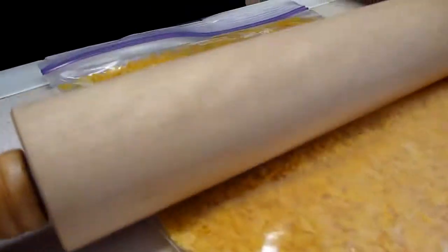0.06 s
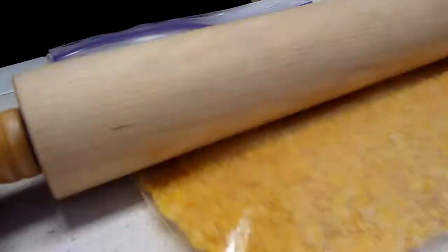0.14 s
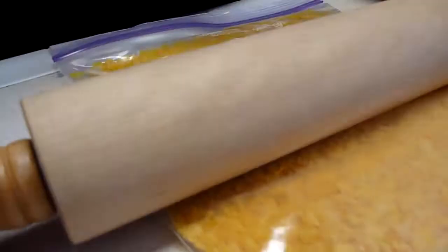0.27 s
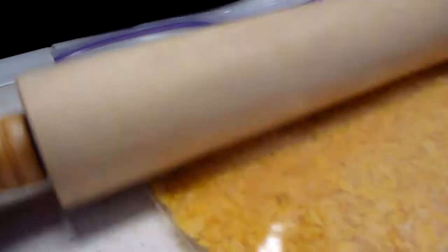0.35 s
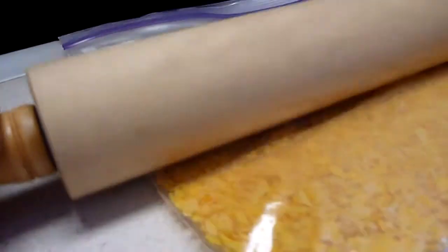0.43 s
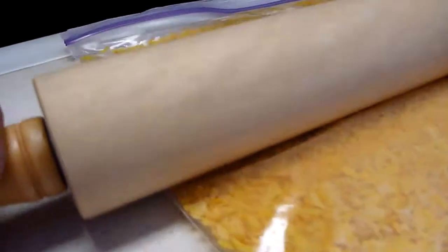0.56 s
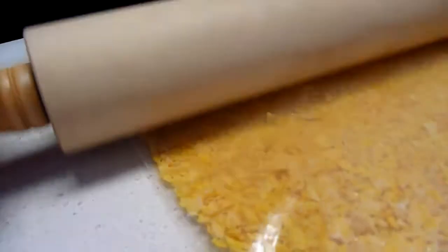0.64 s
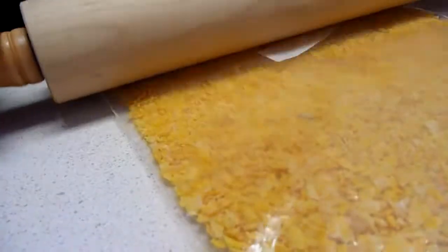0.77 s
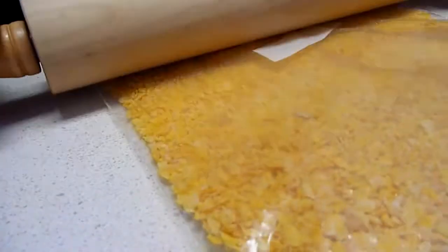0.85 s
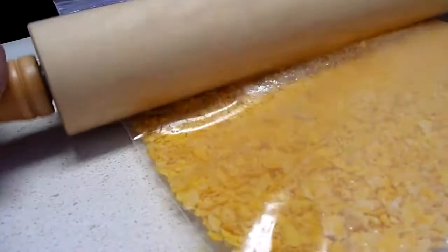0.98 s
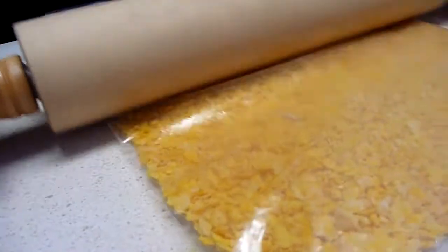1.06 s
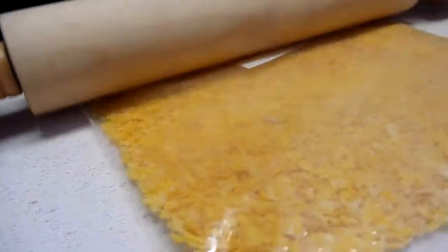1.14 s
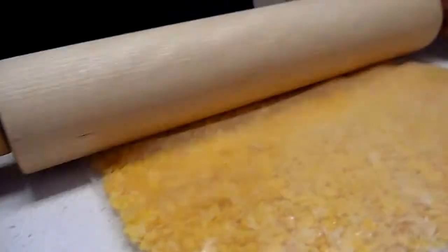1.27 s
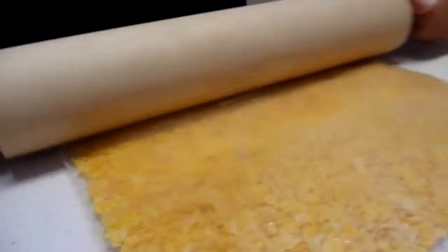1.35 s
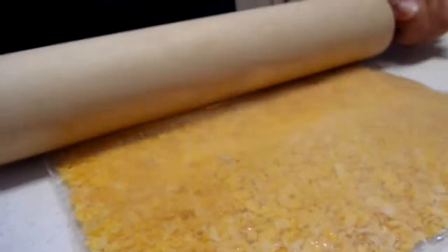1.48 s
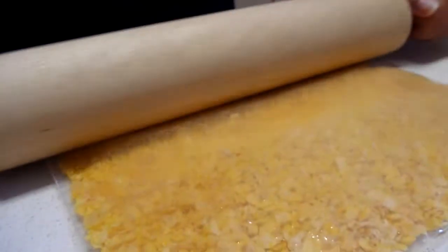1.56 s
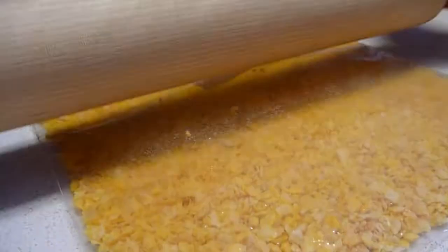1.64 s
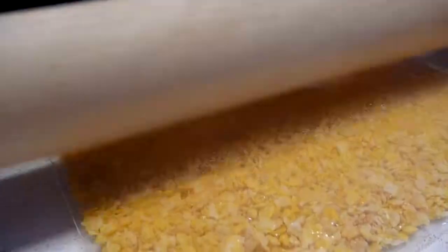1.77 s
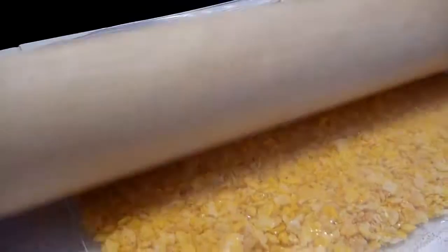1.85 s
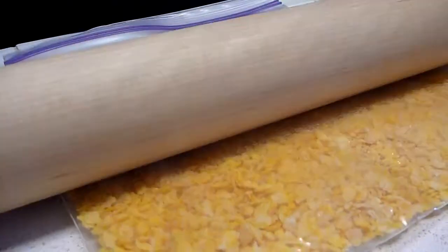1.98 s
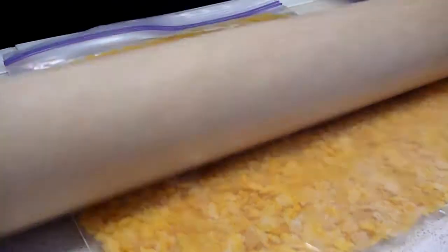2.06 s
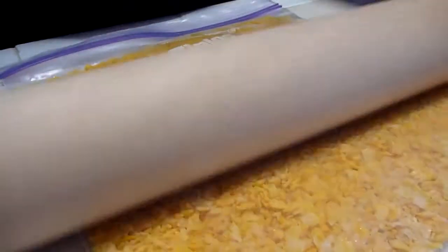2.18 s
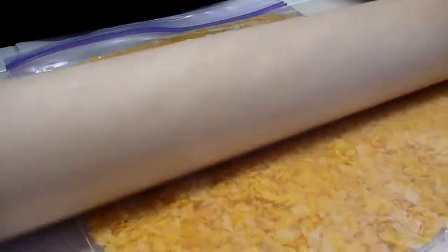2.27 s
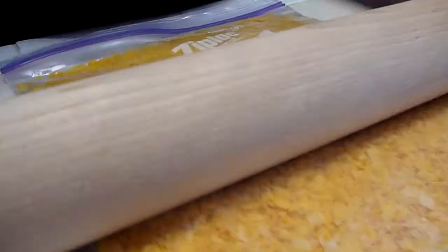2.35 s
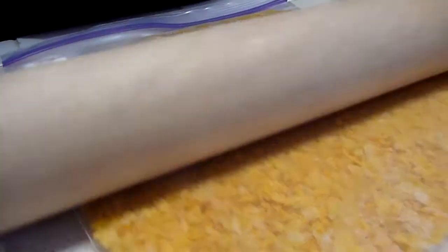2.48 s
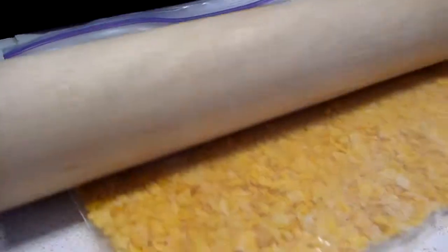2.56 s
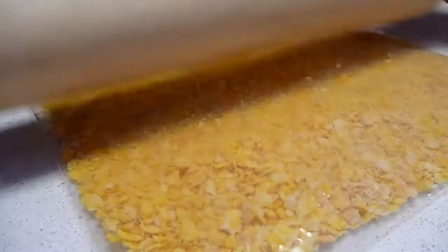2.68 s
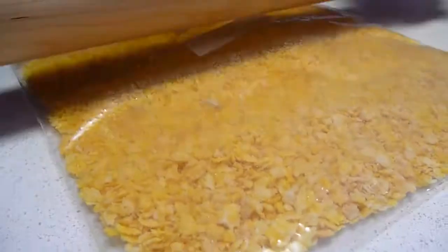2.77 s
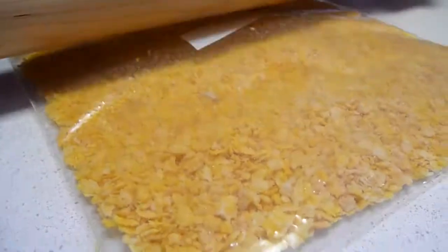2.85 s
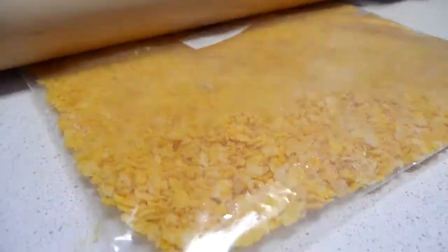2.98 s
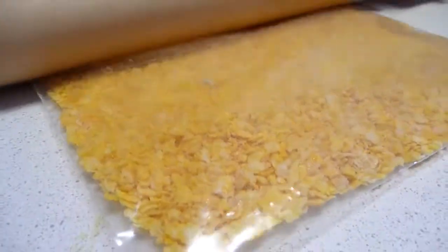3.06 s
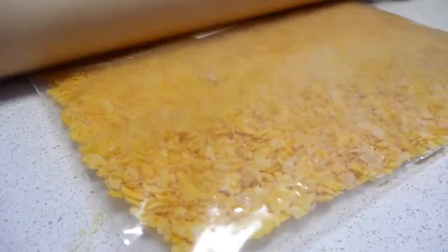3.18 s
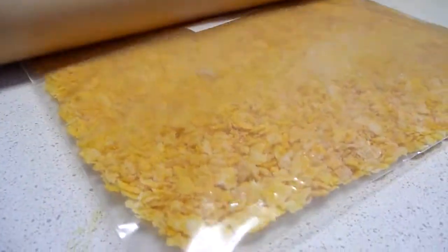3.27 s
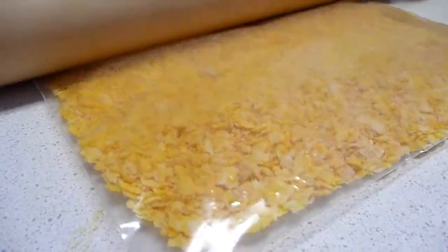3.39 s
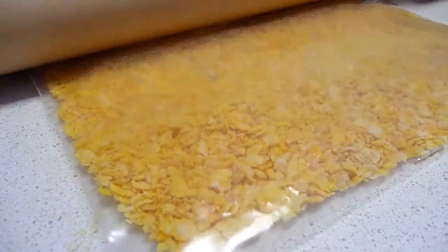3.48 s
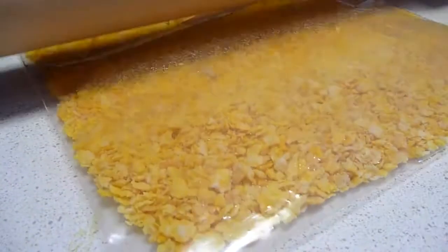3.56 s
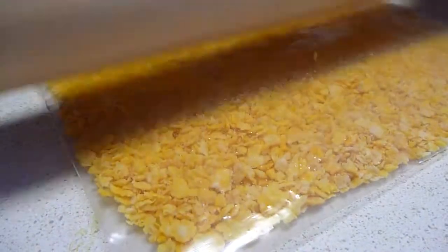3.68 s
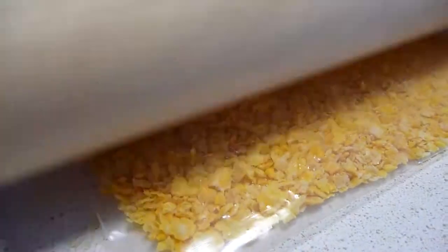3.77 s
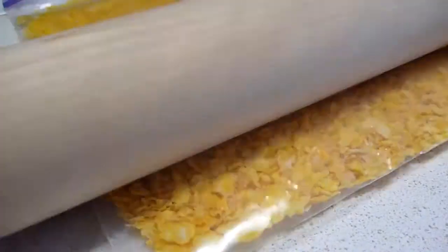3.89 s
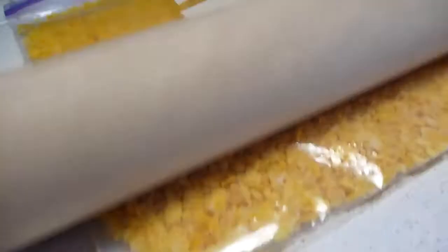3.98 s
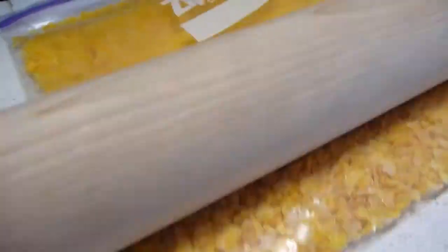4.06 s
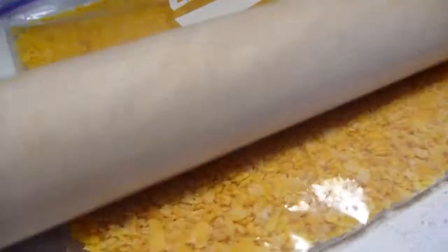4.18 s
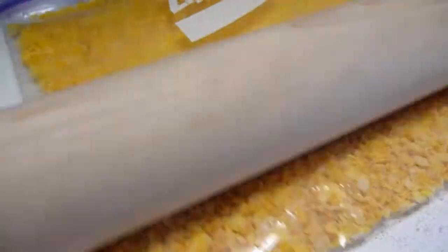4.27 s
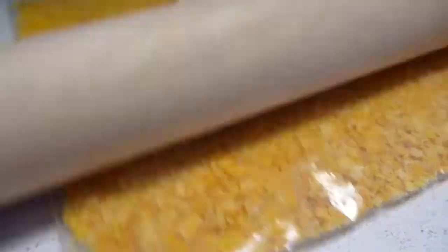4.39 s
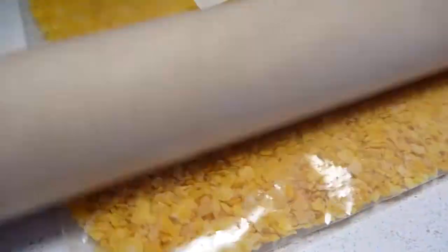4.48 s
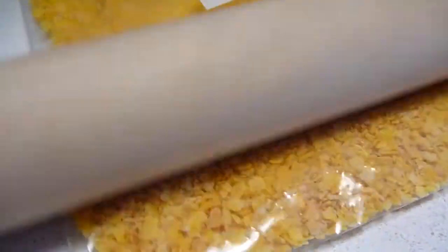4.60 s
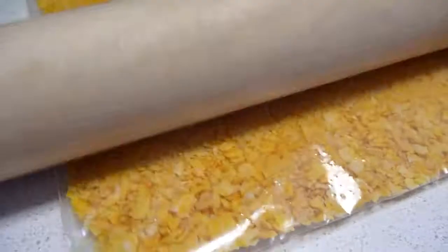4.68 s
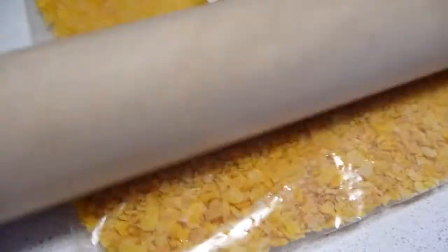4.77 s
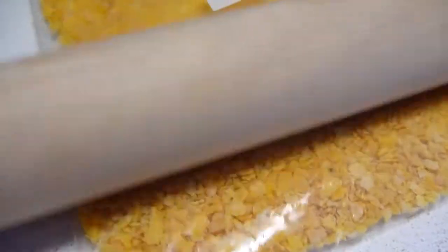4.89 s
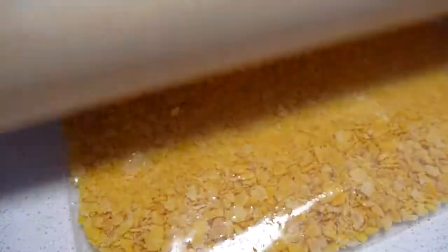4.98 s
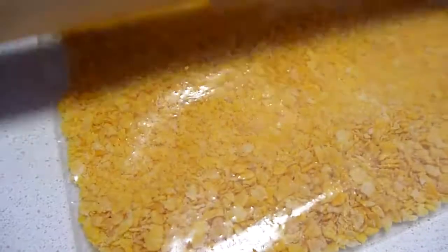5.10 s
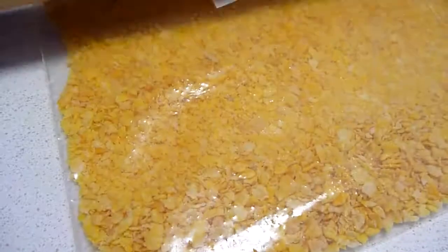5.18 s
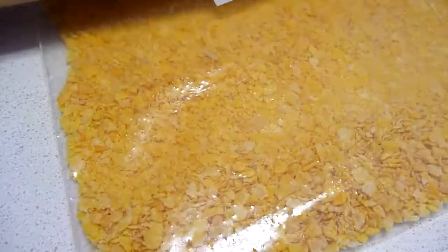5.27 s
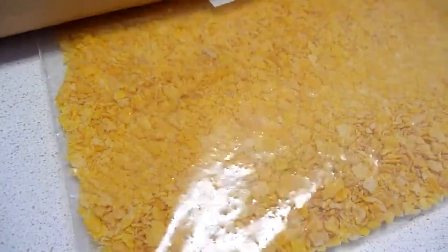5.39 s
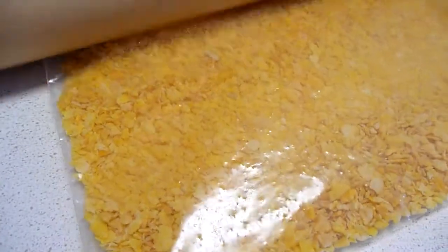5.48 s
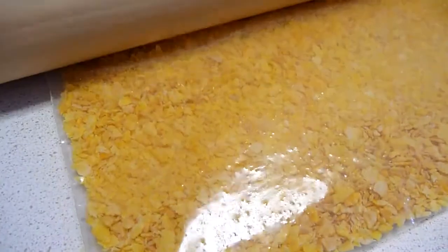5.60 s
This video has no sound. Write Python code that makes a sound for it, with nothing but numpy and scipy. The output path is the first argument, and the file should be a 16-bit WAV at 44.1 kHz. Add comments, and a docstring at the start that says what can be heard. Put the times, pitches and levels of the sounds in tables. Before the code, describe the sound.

Close, crisp bursts of crushing flakes with plastic crinkle and low counter thuds, broken by brief pauses, a faint squeak and hard knocks.

```python
"""In a kitchen a wooden rolling pin is rocked in short strokes on a sealed plastic bag of dry cereal.
Flakes break as dense damped-sine grains: thuds in the counter, cracks under the pin, crinkles of the film.
Big cracks, film snaps and knocks that ring the pin are single pings with a faint room echo.
Shaped noise is the soft hum of the room; once a stick-slip sum of wavering overtones squeaks.
The microphone has two narrow notches, soft saturation and a steep treble limit."""
import sys
import numpy as np
from scipy import signal
from scipy.fft import rfft, irfft, next_fast_len
from scipy.io import wavfile
from scipy.ndimage import map_coordinates

SR = 44100
rng = np.random.default_rng(int(sys.argv[2]) if len(sys.argv) > 2 else 0)


def transcribe(signal):
    """Save signal, clipped to [-1, 1], as a 16-bit WAV file at the path in sys.argv[1]."""
    frames = np.atleast_2d(signal).T
    limited = np.clip(frames, -1, 1)
    pcm = np.round(limited * 32767).astype(np.int16)
    wavfile.write(sys.argv[1], SR, pcm)


def voltage_ratio(decibels):
    """Convert decibels (scalar or array-like) to amplitude ratios, 20 dB per decade."""
    exponent = np.asarray(decibels, float) / 20
    return 10 ** exponent


N = 248724  # samples


def unit(x):
    """Scaled to rms 1."""
    return x / np.sqrt(np.mean(x ** 2) + 1e-20)


def along(points, hz):
    """(Hz, value) points interpolated on a log frequency axis."""
    f, v = np.transpose(points)
    return np.interp(np.log(hz + 1), np.log(f + 1), v)


def wobble(knots_per_s):
    """A smooth random curve through normal random knots."""
    knots = rng.standard_normal(int(N * knots_per_s / SR) + 4)
    return map_coordinates(knots, [np.arange(N) * knots_per_s / SR])


def filtered(x, response):
    """x times a complex response of frequency."""
    m = next_fast_len(N + SR // 2)
    return irfft(rfft(x, m) * response(np.fft.rfftfreq(m, 1 / SR)), m)[..., :N]


def pings(start_s, hz, cycles, gain, size):
    """Damped sines with soft onsets, e^-3 after the given cycles, tapered to zero over size samples."""
    turns = hz[:, None] * np.arange(size) / SR
    taper = np.cos(np.pi / 2 * np.arange(size) / size)
    shape = (1 - np.exp(-turns / 0.2)) * np.exp(-3 * turns / cycles) * taper
    waves = gain[:, None] * shape * np.sin(2 * np.pi * turns)
    at = np.round(start_s * SR).astype(int)[:, None] + np.arange(size)
    return np.bincount(at.ravel(), waves.ravel(), N + size)[:N]


# noise density of the room: f/Hz, level/dB
HUM_SPECTRUM = [(20, -26), (60, -15), (90, -29), (130, -13), (182, -23), (218, 0), (274, -13), (320, -2),
                (420, -6.5), (520, -5), (1580, -11), (2330, -13), (2940, -13.5), (6000, -18),
                (11800, -24.5), (15300, -61)]
HUM_DB = -54.5


def hum():
    """Soft room noise: shaped Gaussian noise with a slight level drift."""
    noise = filtered(rng.standard_normal(N), lambda f: voltage_ratio(along(HUM_SPECTRUM, f)))
    return voltage_ratio(HUM_DB + 0.91 * wobble(8.1)) * unit(noise)


# room decay: f/Hz, t60/s
ROOM_DECAY = [(200, 0.86), (2000, 0.18), (10000, 0.099)]


def kitchen(x):
    """Room echo: a noise tail in which each frequency decays at its own speed."""
    hz, t, z = signal.stft(rng.standard_normal(SR // 2), SR, nperseg=256)
    decay = voltage_ratio(-60 * t / along(ROOM_DECAY, hz)[:, None])
    tail = signal.istft(z * decay, SR, nperseg=256)[1]
    return signal.fftconvolve(np.pad(x, (200, 0)), tail / np.linalg.norm(tail))[:N]


# harmonics of the squeak: multiple of the fundamental, level/dB
SQUEAK_HARMONICS = [(1, -14), (2, 0), (3, -14), (4, -14), (5, -12), (6, -2), (7, -25), (8, -21), (9, -25),
                    (10, -20), (11, -21), (13, -24)]
# slips of the squeak: t/s, level/dB
SQUEAK_SLIPS = [(3.575, -50), (3.6, -39), (3.642, -38), (3.676, -46), (3.707, -43), (3.737, -45),
                (3.775, -58)]
SLIP_DB_PER_S = 560  # swell and fade around each slip
SQUEAK_S, SQUEAK_HZ, SAG_HZ_PER_S = 3.6, 674, 31  # pitch sags from SQUEAK_S on
DULL_DB_PER_S, SIXTH_DB_PER_S, MAX_DULL_DB = 40, 300, 20  # loss of orders > 5 away from SQUEAK_S


def squeak():
    """Stick-slip in short slips, sagging in pitch; overtones waver, the high ones peak at SQUEAK_S."""
    t = np.arange(N) / SR
    level_db = np.max([db - SLIP_DB_PER_S * np.abs(t - s) for s, db in SQUEAK_SLIPS], 0)
    sag_s = np.clip(t - SQUEAK_S, 0, 1)
    turns = np.cumsum((SQUEAK_HZ - SAG_HZ_PER_S * sag_s) * (1 + 0.005 * wobble(60))) / SR
    out = np.zeros(N)
    for order, db in SQUEAK_HARMONICS:
        dull_db_per_s = SIXTH_DB_PER_S if order == 6 else DULL_DB_PER_S * (order > 5)
        dull_db = np.minimum(dull_db_per_s * np.abs(t - SQUEAK_S), MAX_DULL_DB)
        gain = np.sqrt(2) * voltage_ratio(level_db + db - dull_db + 2.7 * wobble(45))
        out += gain * np.sin(2 * np.pi * (order * turns + rng.random()))
    return out


# free knocks: t/s, thump level/dB, ring level/dB, extra upper-mode level/dB, crushed-flake burst level/dB
PIN_KNOCKS = [(1.5485, -40, -27, 14, -25), (2.9556, -6, -32, 6, -19), (5.3192, -3, -17, -10, -20)]
# modes of the pin: f/Hz, level/dB, t60/s (before the taper)
PIN_MODES = [(2340, -15, .45), (2331, 0, .1), (2430, -14, .25), (2546, -10, .09)]
UPPER_HZ = 2500


def knocks():
    """A knock thumps the counter and rings the pin; where it lands sets how much the upper mode speaks."""
    s, thump_db, ring_db, upper_db, _ = np.transpose(PIN_KNOCKS)
    ring = np.zeros(N)
    for hz, db, t60_s in PIN_MODES:
        gain = voltage_ratio(ring_db + db + upper_db * (hz > UPPER_HZ))
        cycles = 3 * hz * t60_s / np.log(1000)
        ring += pings(s + 0.00156, np.full(len(s), hz), cycles, gain, size=16000)
    thump = pings(s, np.full(len(s), 375), 3.2, voltage_ratio(thump_db), size=3000)
    return ring * voltage_ratio(2.3 * wobble(70)) + thump


def blow_load():
    """Each knock crushes a burst of flakes at once: gain rises, then falls, within milliseconds."""
    t = np.arange(N) / SR
    out = np.zeros(N)
    for s, *_, burst_db in PIN_KNOCKS:
        u = t - s - .002
        out += voltage_ratio(burst_db) * np.where(u < 0, np.exp(np.minimum(u, 0) / 0.0034), np.exp(-np.abs(u) / 0.0036))
    return out


# sharp snaps of the film: t/s, level/dB
FILM_SNAPS = [(0.1675, -21), (0.6189, -27), (0.9955, -11.5), (1.007, -13.5), (2.379, -23), (2.9597, -10.5),
              (3.261, -20), (4.106, -18.5), (4.192, -17), (4.4342, -22), (5.321, -10), (5.5521, -11.5)]


def snaps():
    """The film buckles: a very short high click, then a duller one under it."""
    s, db = np.transpose(FILM_SNAPS)
    draw = rng.standard_normal((len(s), 2))
    click = pings(s, 8600 * np.exp(0.073 * draw[:, 0]), 2.5, voltage_ratio(db + 11), size=80)
    dull = pings(s + .0012, 5600 * np.exp(.3 * draw[:, 1]), 2.5, voltage_ratio(db + 3), size=80)
    return click + dull


# big flakes and blows: t/s, crack level/dB, thud level/dB
BIG_CRACKS = [(0.056, -15.5, -14), (0.169, -25, -27), (0.1976, -11, -7), (0.2716, -12.5, -34),
              (0.3104, -15, -16), (0.343, -11, -6), (0.4129, -9, -32), (0.4397, -7, -17),
              (0.4505, -8.5, -21), (0.5205, -6.5, -20), (0.8774, -4.5, -13), (0.9346, -7, -19),
              (0.977, -14, -21), (1.0079, -24, -23), (1.051, -21, -13), (1.2101, -4, -13),
              (1.2631, -6.5, -13), (1.3326, -6.5, -23), (1.4559, -13, -15), (1.4669, -10.5, -29),
              (1.5486, -20, -16.5), (1.8924, -4, -25), (1.927, -14, -11), (1.9551, -10, -12),
              (1.963, -7, -6), (2.0442, -18, -19), (2.1998, -14, -17), (2.2625, -13, -30),
              (2.3333, -10, -27), (2.381, -14, -21), (2.4183, -5.5, -30), (2.4317, -11, -19),
              (2.4477, -15, -12), (2.9565, -7, -5), (2.9647, -9, -4.5), (3.107, -10.5, -13),
              (3.1844, -12, -16), (3.2013, -8.5, -16), (3.212, -14, -17), (3.2265, -5.5, -23),
              (3.2702, -7.5, -26), (3.2768, -8, -19), (3.2992, -8, -32), (3.332, -18, -26),
              (3.8965, -18, -31), (3.9533, -10, -7), (4.088, -22, -32), (4.1041, -17, -20),
              (4.1429, -16, -12), (4.1592, -8, -8), (4.193, -9, -13), (4.231, -11, -7),
              (4.3681, -15, -10.5), (4.4026, -13, -26), (4.4261, -10.5, -18), (4.4356, -8, -21),
              (4.5784, -16, -31), (4.6206, -12, -25.5), (4.6309, -16, -6.5), (4.6898, -33, -23),
              (4.7559, -19, -24), (4.8127, -14.5, -17.5), (5.3211, 2.5, -6.5), (5.488, -24, -25)]
CRACK_HZ, CRACK_SCATTER = 2230, 0.025  # pitch, its log spread


def cracks():
    """Each big flake gives a short crack, a low push into the counter and a faint tick in the film."""
    s, db, thud_db = np.transpose(BIG_CRACKS)
    draw = rng.standard_normal((len(s), 4))
    crack_hz = CRACK_HZ * np.exp(CRACK_SCATTER * draw[:, 3])
    crack = pings(s, crack_hz, 3.34, voltage_ratio(db + 3) * np.sign(draw[:, 1]), size=300)
    thud = pings(s, 480 * np.exp(0.27 * draw[:, 0]), 2.55, voltage_ratio(thud_db - 2.5), size=900)
    tick = pings(s, 5500 * np.exp(0.53 * draw[:, 1]), 3.0, voltage_ratio(db - 8 + 1.7 * draw[:, 2]), size=60)
    return crack + thud + tick


def debris():
    """Gain of the smaller breaks each big crack sets off: starts at once, dies within milliseconds."""
    s, db, *_ = np.transpose(BIG_CRACKS)
    shower_gain = voltage_ratio(np.minimum(db, -11))  # a flake holds only so many crumbs
    starts = np.bincount(np.round(s * SR).astype(int), shower_gain, N)
    return signal.fftconvolve(starts, np.exp(-np.arange(SR // 20) / SR / 0.0039))[:N]


# pin strokes and faint bag rustles:
# t/s, length/s, crack level/dB, swell to the end/dB, crinkle level re crack/dB
PIN_STROKES = [(0.0, 0.031, -37.5, -2, -8), (0.062, 0.033, -27.5, 5.5, -11.5),
               (0.176, 0.077, -24.5, -6.5, -8), (0.277, 0.015, -32, 0, -13),
               (0.314, 0.059, -24, -2.0, -10.5), (0.41, 0.1, -27, -1.5, -8.5), (0.574, 0.045, -43, 4.5, -5),
               (0.656, 0.16, -52, 6.5, 2), (0.82, 0.028, -32.0, 4, -11.5), (0.876, 0.11, -27.0, 3.0, -8.5),
               (1.048, 0.055, -27.5, 2, -10.5), (1.151, 0.098, -27.5, 3, -8.5),
               (1.311, 0.075, -28.5, 1.5, -11), (1.439, 0.073, -31.5, 1.5, -9),
               (1.566, 0.076, -46, -10, -16), (1.85, 0.02, -52.5, -1, -5), (1.889, 0.0077, -24, -0.5, -5),
               (1.924, 0.039, -28.5, 3.5, -13), (2.01, 0.17, -27, -11, -8),
               (2.172, 0.062, -21.5, -8.5, -11.5), (2.261, 0.067, -30.5, 4.5, -11),
               (2.375, 0.072, -33, 10, -10), (2.517, 0.093, -47.5, 5.5, -5.0), (2.665, 0.24, -59.5, 4, -8),
               (2.928, 0.027, -51.0, 4, -7), (2.962, 0.122, -35, 9.5, -9.5),
               (3.165, 0.056, -27.5, 2.5, -11.5), (3.27, 0.096, -28.5, 3.5, -11),
               (3.453, 0.052, -47, -7, -8), (3.563, 0.26, -49, -8, -6.5), (3.825, 0.012, -50, 0, -3),
               (3.85, 0.0081, -21, -2, -7), (3.895, 0.11, -29, 3.5, -8.5), (4.076, 0.074, -30.5, 7, -9.0),
               (4.179, 0.072, -28.5, 1.5, -9.0), (4.319, 0.055, -33.5, 9, -8),
               (4.426, 0.075, -27.0, 2.5, -8), (4.583, 0.058, -28.5, 3.5, -10),
               (4.69, 0.094, -25.5, -2, -9), (4.842, 0.054, -47, 3.5, -7), (4.96, 0.21, -59.5, 0.5, -8),
               (5.16, 0.12, -56.5, 2, -4.5), (5.287, 0.02, -49.5, 3, -3.0), (5.32, 0.11, -42, -2.5, -11),
               (5.414, 0.033, -36.0, 6.5, -6), (5.457, 0.059, -28, 0, -6.5), (5.536, 0.095, -37, -4, -5.0)]
RISE_DB_PER_S, FALL_DB_PER_S = 742, 244  # bite of a stroke, settling of the flakes
LANDING_DB_PER_S, LANDING_STEP_DB = 1700, 20  # faster bite if this far above the stroke before
THUD_DB, THUD_DB_PER_DB, FIRM_DB = -1.02, 0.18, -24  # thud re crack at firm load, extra per dB of load


def strokes():
    """Each stroke bites fast, swells or sags, then settles; gives thud, crack, crinkle levels in dB."""
    t = np.arange(0, N + 32, 32) / SR
    s, length, db, swell_db, film_db = np.transpose(PIN_STROKES)[:, :, None]
    u = t - s
    lands = np.diff(db, axis=0, prepend=db[:1]) > LANDING_STEP_DB  # from the air
    rise = np.where(lands, LANDING_DB_PER_S, RISE_DB_PER_S)
    load_db = db + swell_db * np.clip(u / length, 0, 1)
    load_db = load_db + rise * np.minimum(u, 0) - FALL_DB_PER_S * np.maximum(u - length, 0)
    thud_db = load_db + THUD_DB + THUD_DB_PER_DB * (load_db - FIRM_DB)
    totals = [10 * np.log10(np.sum(voltage_ratio(2 * v), 0) + 1e-20) for v in (thud_db, load_db, load_db + film_db)]
    return [np.interp(np.arange(N) / SR, t, v) for v in totals]


def grains(spectrum, count, size, cycles, spread_db, hiss, clump_db):
    """Breaking grains of random pitch, life and size, in clumps, over the hiss of the finest dust; rms 1."""
    draw = rng.random((count, 4))
    lo, hi = spectrum[0][0], spectrum[-1][0]
    hz = lo + (hi - lo) * draw[:, 1]
    life = cycles * 3.8 ** (2 * draw[:, 3:] - 1)
    gain = voltage_ratio(-spread_db * np.log(1 - .99 * draw[:, 2]))  # few big, many small
    gain = gain * np.sqrt(hz / life[:, 0])  # equal energy at any pitch
    x = unit(pings(draw[:, 0] * N / SR, hz, life, gain, size))
    x = x + hiss * rng.standard_normal(N) * np.sqrt(SR / 2 / (hi - lo))
    x = filtered(x, lambda f: voltage_ratio(along(spectrum, f)))
    return unit(x * voltage_ratio(clump_db))


# density of thuds in the counter: f/Hz, level/dB
COUNTER_SPECTRUM = [(35, -69), (60, -67), (106, -26), (139, -11), (172, -3.5), (225, 2), (299, -5),
                    (412, 1), (450, -3), (496, 2.5), (590, -3.5), (676, -3.5), (756, 1.5), (1000, -8),
                    (1150, -8.5), (1500, -12), (2530, -120)]
# density of cracking flakes: f/Hz, level/dB
FLAKE_SPECTRUM = [(590, -17.5), (1000, -14.5), (1090, -7.5), (1310, -6), (1790, -1.5), (2120, -3),
                  (2450, 1), (2680, -2.5), (2890, -9), (3300, -6.5), (3970, -13), (4410, -12), (5200, -25),
                  (6760, -21), (11400, -120)]
# density of crinkling film: f/Hz, level/dB
FILM_SPECTRUM = [(2710, -9.5), (4600, -3), (5580, -6.5), (6510, -6.5), (7860, -3.5), (8880, -1.5),
                 (10000, -7), (11200, -5), (11800, -8.5), (15300, -48), (22000, -120)]


def crush():
    """Under load the pin jerks from flake to flake, clumping all layers; a light touch only rustles."""
    thud_db, crack_db, crinkle_db = strokes()
    load = np.clip((crack_db + 39) / 16, .15, 1)
    jerk_db = load * (0.58 * wobble(24.98) + 1.0 * wobble(90))
    thud = grains(COUNTER_SPECTRUM, count=8000, size=600, cycles=6.1, spread_db=2.5, hiss=0.82,
                  clump_db=jerk_db + 0.73 * wobble(20))
    crack = grains(FLAKE_SPECTRUM, count=14000, size=400, cycles=8.1, spread_db=3.0, hiss=0.86,
                   clump_db=0.92 * jerk_db)
    crinkle = grains(FILM_SPECTRUM, count=24000, size=64, cycles=5.6, spread_db=2.5, hiss=0.84,
                     clump_db=1.37 * jerk_db + 1.83 * wobble(40))
    draw = rng.random((900, 3))  # middling flakes, near the pin's ring
    flakes = unit(pings(draw[:, 0] * N / SR, 2050 + 560 * draw[:, 1], 4.4, voltage_ratio(8.0 * draw[:, 2]), size=200))
    blow, shower = blow_load(), debris()
    thud = (voltage_ratio(thud_db) + voltage_ratio(-23.5) * shower) * thud
    crack = (voltage_ratio(crack_db - 1.0) + blow + voltage_ratio(-23) * shower) * crack
    crinkle = (voltage_ratio(crinkle_db) + voltage_ratio(-13) * blow + voltage_ratio(-30.0) * shower) * crinkle
    return thud + crack + voltage_ratio(crack_db - 8) * load * flakes + crinkle


BASS_HZ = 106.4


def scene():
    """Near sources and their echo under a steep bass cut, plus the squeak, its echo and the room."""
    room = hum()
    far = squeak()
    hits = knocks() + snaps() + cracks()
    near = crush() + hits + voltage_ratio(-18.5) * kitchen(hits)
    bass_cut = lambda f: ((1j * f) ** 2 / (BASS_HZ ** 2 - f * f + 1.2j * f * BASS_HZ)) ** 3
    return (filtered(near, bass_cut) + far + voltage_ratio(-16) * kitchen(far) + room)[None]


def roll_off(x):
    """The treble ends steeply here."""
    return signal.sosfilt(signal.butter(12, 12870, fs=SR, output="sos"), x)


# notches of the microphone housing: f/Hz, width/Hz, depth/0-1
HOUSING_NOTCHES = [(2887, 190, 1), (7960, 100, 1)]
TOP_HZ = 11750


def record(dry):
    """Two notches of the microphone housing, soft saturation of the hardest blow, a steep band limit."""
    def notch(f):
        return np.prod([1 - depth * 1j * f * width / (hz * hz - f * f + 1j * f * width)
                        for hz, width, depth in HOUSING_NOTCHES], axis=0)
    x = filtered(dry, notch)
    x = x / (1 + np.abs(x / .95) ** 6) ** (1 / 6)
    mix = filtered(x, lambda f: 1 / np.sqrt(1 + (f / TOP_HZ) ** 300))
    return roll_off(mix)


dry = scene()
out = record(dry)
transcribe(out)
```